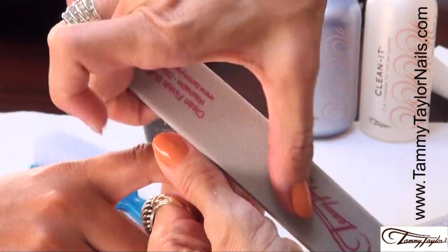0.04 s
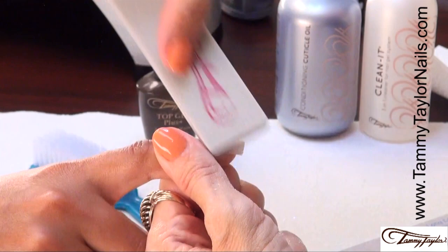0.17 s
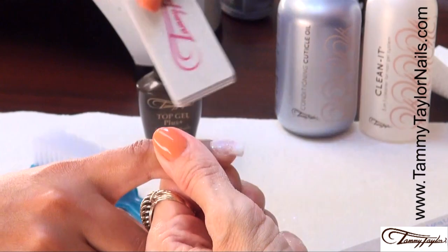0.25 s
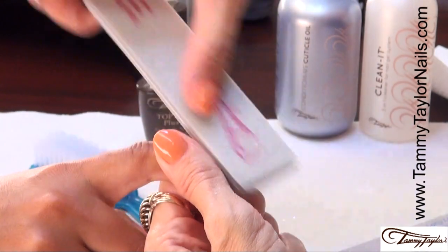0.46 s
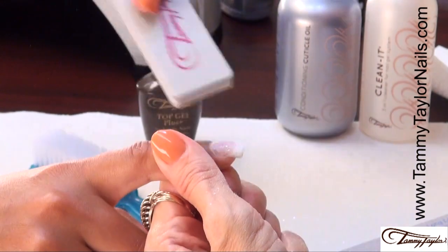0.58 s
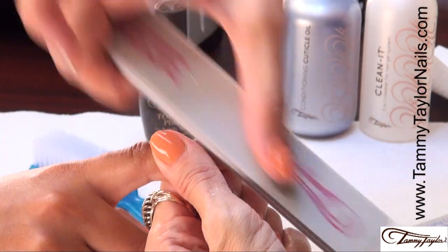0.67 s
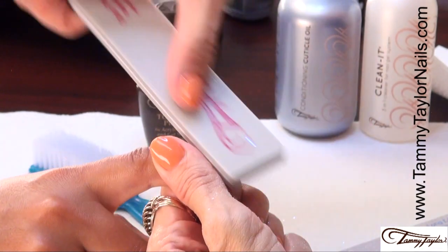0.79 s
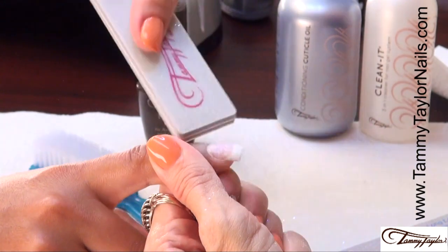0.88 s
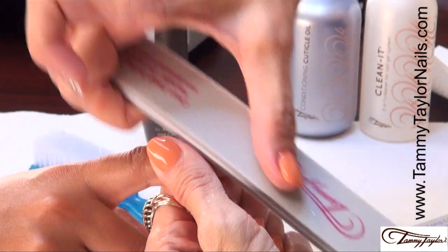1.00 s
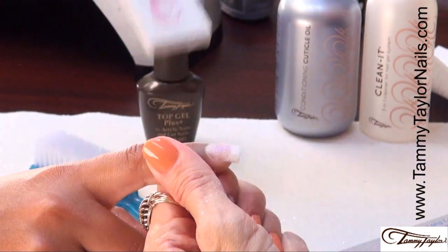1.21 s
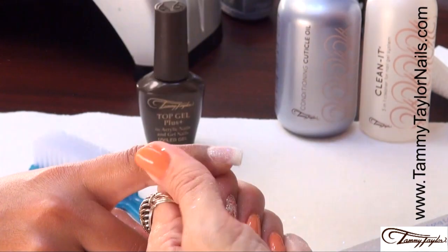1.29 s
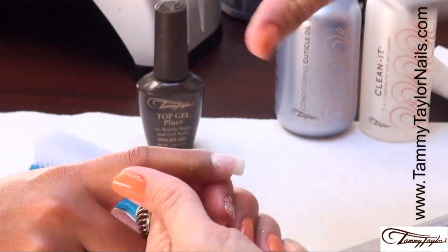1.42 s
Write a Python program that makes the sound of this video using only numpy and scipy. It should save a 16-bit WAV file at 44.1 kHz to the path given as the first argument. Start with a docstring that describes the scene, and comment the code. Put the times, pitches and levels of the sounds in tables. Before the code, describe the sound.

A hand file rasps across a fingernail, close by, in a quiet room. Four firm, gritty pushes come at about 0.2, 0.5, 0.85 and 1.15 seconds, each lasting just over a tenth of a second, growing brighter and carrying thin, high squeaks. A lighter return brush comes just before each push. The strokes leave a very short room echo, and a faint hum continues underneath.

```python
"""A hand file rasps across a fingernail, about three strokes a second, in a quiet room with a faint hum.
Each pass is a light return brush, then a firm push: grit catches the nail's edge thousands of times
a second and rings nail and file. A push bites with a dull thrum of the fingertip, brightens as it
runs on, and squeaks where the file sticks and slips. The room answers with a short tail."""
import sys
import numpy as np
from scipy import signal
from scipy.fft import rfft, irfft
from scipy.io import wavfile

SR = 44100
rng = np.random.default_rng(int(sys.argv[2]) if len(sys.argv) > 2 else 0)


def unload_audio(sound):
    """Save the sound as a 16-bit wav file, at the path given as the first command line argument."""
    columns = np.transpose(np.atleast_2d(sound))
    # keep every value between -1 and 1, then stretch to whole-number steps
    steps = np.round(np.clip(columns, -1, 1) * 32767)
    wavfile.write(sys.argv[1], SR, steps.astype(np.int16))


N = 63945
LEAD_SAMPLES = SR // 4  # space for a stroke begun before time zero


def amp(db):
    """Decibels to gain."""
    return 10 ** (np.asarray(db) / 20)


def unit_rms(x):
    """Scales to rms 1."""
    return x / np.sqrt(np.mean(x ** 2) + 1e-20)


def curve_at(points, hz):
    """Interpolates a table on a log-frequency axis."""
    f, value = np.transpose(points)
    return np.interp(np.log(hz + 1), np.log(f + 1), value)


def shaped(x, gain):
    """Filters x by a gain given as a function of frequency."""
    return irfft(rfft(x) * gain(np.fft.rfftfreq(len(x), 1 / SR)), len(x))


def coloured(x, spectrum):
    """Filters x by a table of Hz and dB, at rms 1."""
    return unit_rms(shaped(x, lambda f: amp(curve_at(spectrum, f))))


def wander(size, hz):
    """Random motion of rms 1, mostly slower than hz."""
    return unit_rms(shaped(rng.standard_normal(size), lambda f: 1 / (1 + (f / hz) ** 2)))


def swell(t, centre_s, spread_s):
    """Gaussian rise and fall."""
    return np.exp(-.5 * ((t - centre_s) / spread_s) ** 2)


# Room air. Each row: frequency in Hz, relative spectral level in dB.
AIR_SPECTRUM = [(25, -18), (60, -3), (120, -0.5), (250, -1), (500, 0), (750, -0.5), (1100, -5.5),
                (2000, -7), (3000, -12.5), (6000, -11.5), (9000, -16.5), (12000, -22)]
# Appliance hum. Each row: frequency in Hz, level in dB.
HUM_TONES = [(118.4, -68.5), (173.5, -64), (348.5, -56.5), (479.1, -64)]


def air_and_hum(air_db=-52, waver_hz=9.3, waver_rad=0.41, waver_db=2):
    """Soft room air and a small appliance's hum, wavering in phase and level."""
    t = np.arange(N) / SR
    mix = amp(air_db) * coloured(rng.standard_normal(N), AIR_SPECTRUM)
    for hz, db in HUM_TONES:
        tone = np.sin(2 * np.pi * (hz * t + rng.random()) + waver_rad * wander(N, waver_hz))
        mix += amp(db) * unit_rms(tone * amp(waver_db * wander(N, waver_hz)))
    return mix


# Room decay. Each row: frequency in Hz, time to fall 60 dB in seconds.
TAIL_T60_S = [(300, 3), (1500, 0.24), (4000, 0.32), (6500, 0.35), (11000, 0.21)]
# Room response. Each row: frequency in Hz, tail gain in dB.
TAIL_GAIN_DB = [(300, -4.5), (2200, -15), (3700, -16.5), (4500, -12.5), (5500, -16.5), (6400, -10.5),
                (8500, -16), (11500, -17.5)]


def room_tail(x, delay_s=0.006):
    """Diffuse reflections, half a second long, each band dying at its own rate."""
    hz, t, bands = signal.stft(rng.standard_normal(SR // 2), SR, nperseg=256)
    t60_s = curve_at(TAIL_T60_S, hz)[:, None]
    decay = np.exp(-np.log(1000) * t / t60_s)
    energy_norm = np.sqrt(2 * np.log(1000) / (t60_s * SR))
    gain = amp(curve_at(TAIL_GAIN_DB, hz))[:, None]
    tail = signal.istft(bands * decay * energy_norm * gain, SR, nperseg=256)[1]
    tail = np.pad(tail, (round(delay_s * SR), 0))
    return signal.fftconvolve(x, tail)[:len(x)]


def grit(size, grains_per_s=20000, spread_db=1.5, judder_db=0.53, judder_hz=172):
    """Abrasive grains catch the nail: dense clicks, juddering with the uneven contact."""
    caught = rng.random(size) < grains_per_s / SR
    strength = amp(spread_db * np.minimum(rng.exponential(1, size), 4))
    clicks = caught * strength * rng.choice([-1, 1], size)
    return clicks * amp(judder_db * wander(size, judder_hz))


# Resonances. Each row: frequency in Hz, width in Hz, added linear gain (negative for a hollow).
NAIL_FILE_MODES = [(2244, 170, 0.71), (2680, 84, 0.71), (2870, 330, -0.25), (3820, 650, 0.94),
                   (4880, 250, 0.49), (5490, 290, 0.64), (5820, 140, 0.33), (6260, 42, -0.041),
                   (6900, 400, 0.35), (8420, 230, 0.8), (9260, 180, 0.69), (11000, 210, 0.54)]


def rasp(size, spectrum):
    """Grit heard through the resonances of nail and file."""
    def body(f):
        modes = sum(gain / (1 + 2j * (f - hz) / width_hz) for hz, width_hz, gain in NAIL_FILE_MODES)
        return amp(curve_at(spectrum, f)) * (1 + modes)
    return unit_rms(shaped(grit(size), body))


def pressure(t, length_s, attack_s, release_s):
    """The file's pressure on the nail: builds, holds, lets go."""
    build = np.minimum(t / attack_s, 1) ** 0.62
    return build * np.exp(-np.maximum(t - length_s, 0) / release_s)


# Brush rasp. Each row: frequency in Hz, relative spectral level in dB.
BRUSH_SPECTRUM = [(100, -26), (600, -12.5), (1250, -19.5), (2100, -3), (2900, -7), (3700, -2.5),
                  (4300, -6.5), (5400, 1), (6400, -0.5), (7800, -1.5), (8700, -2.5), (10000, -5.5),
                  (12000, -14.5)]
# Light strokes. Each row: start and end in seconds, level in dB, attack and release in seconds,
# tilt in dB per octave.
BRUSH_STROKES = [(0.15, 0.159, -35.5, 0.0038, .013, -2), (0.4549, 0.497, -30, 0.0018, 0.0088, 0),
                 (0.793, .821, -31, .009, 0.0058, -0.5), (0.971, 0.99, -34.5, 0.0024, 0.0042, -2),
                 (1.104, 1.136, -31.5, 0.0084, 0.0065, -1), (1.366, 1.387, -45.5, .010, 0.015, 3.5)]


def brush(start_s, end_s, db, attack_s, release_s, tilt_db_per_oct):
    """The file grazes the nail with little pressure."""
    t = np.arange(SR // 8) / SR
    spectrum = [(hz, level + tilt_db_per_oct * np.log2(hz)) for hz, level in BRUSH_SPECTRUM]
    return start_s, amp(db) * pressure(t, end_s - start_s, attack_s, release_s) * rasp(len(t), spectrum)


# Squeaks in the pushes. Each row: centre in seconds, pitch in Hz, level in dB, spread in seconds.
STICK_SLIP_SQUEAKS = [(.250, 3620, -30, 0.027), (0.549, 5770, -30, 0.011), (.580, 3660, -28, 0.015),
                      (.871, 5680, -25, .011), (.891, 3610, -26.5, .019), (0.957, 5520, -31, 0.018),
                      (1.176, 5700, -27.5, 0.0049), (1.222, 3540, -30, .026), (1.253, 5320, -25.5, 0.012)]


def squeak(centre_s, hz, db, spread_s, width_hz=630):
    """Sticking and slipping drives one resonance hard for a moment."""
    t = np.arange(SR // 5) / SR
    half_s = t[-1] / 2
    ring = unit_rms(shaped(grit(len(t)), lambda f: 1 / (1 + 2j * (f - hz) / width_hz) ** 2))
    return centre_s - half_s, amp(db) * swell(t, half_s, spread_s) * ring


# Push rasp and fingertip thrum. Each row: frequency in Hz, relative spectral level in dB.
PUSH_SPECTRUM = [(100, -70), (700, -30.5), (1300, -22), (1700, -10), (2300, -5.5), (2900, -9), (3350, -3.5),
                 (4400, -4.5), (5600, -1), (6400, -4), (7600, -4), (9000, -5), (10500, -9.5), (12000, -20)]
THRUM_SPECTRUM = [(60, -26), (150, -3.5), (500, -3), (850, 1), (1300, -8), (2200, 3), (5000, -39)]
# Firm strokes. Each row: start and end in seconds, level in dB, attack in seconds, sag by the end in dB,
# final treble gain in dB, initial low gain in dB, relative thrum level in dB, thrum delay in seconds.
PUSH_STROKES = [(-.14, -0.014, -25, .03, -2.5, -1, -4, -22, 0.031),
                (.192, 0.316, -23.5, 0.026, -2, -0.5, -1.5, -24.5, 0.037),
                (0.525, 0.644, -22.5, .032, -3, 0, 0.5, -24, 0.04),
                (0.847, 0.972, -22.5, 0.018, -3, -1.5, 2, -20, 0.035),
                (1.164, 1.271, -25, 0.0088, -0.5, -1, 1, -18, 0.034)]


def push(start_s, end_s, db, attack_s, sag_db, treble_db, low_db, thrum_db, thrum_delay_s):
    """A firm stroke: the fingertip thrums, the treble grows, the low rasp fades as the pressure eases."""
    treble_hz, brighten_db = 6340, 4.0
    low_hz, low_sag_db = 3000, -5
    t = np.arange(SR // 5) / SR
    travel = np.minimum(t / (end_s - start_s), 1)
    scrape = rasp(len(t), PUSH_SPECTRUM)
    treble = shaped(scrape, lambda f: 1 - 1 / (1 + (f / treble_hz) ** 10))
    low = shaped(scrape, lambda f: 1 / (1 + (f / low_hz) ** 20))
    middle = scrape - treble - low
    low *= amp(low_db + low_sag_db * travel ** 2)
    treble *= amp(treble_db + brighten_db * np.minimum(2 * travel - 1, 0))  # full by mid-stroke
    scrape = (low + middle + treble) * amp(sag_db * travel)
    thrum = coloured(grit(len(t)), THRUM_SPECTRUM) * swell(t, thrum_delay_s, spread_s=0.029)
    contact = pressure(t, end_s - start_s, attack_s, release_s=0.0023)
    return start_s, amp(db) * contact * (scrape + amp(thrum_db) * thrum)


def scene():
    """Pushes, squeaks and brushes in the room, over air and hum; mono."""
    filing = np.zeros(LEAD_SAMPLES + N)
    for source, table in (push, PUSH_STROKES), (squeak, STICK_SLIP_SQUEAKS), (brush, BRUSH_STROKES):
        for row in table:
            start_s, sound = source(*row)
            slot = filing[round(start_s * SR) + LEAD_SAMPLES:][:len(sound)]
            slot += sound[:len(slot)]
    in_room = (filing + room_tail(filing))[LEAD_SAMPLES:]
    return (in_room + air_and_hum())[None]


def record(dry):
    """Steep low-pass."""
    cutoff_hz = 12050
    lowpass = signal.firwin(301, cutoff_hz, window=("kaiser", 7), fs=SR)
    return signal.oaconvolve(dry, lowpass[None], "same")


dry = scene()
out = record(dry)
unload_audio(out)
```